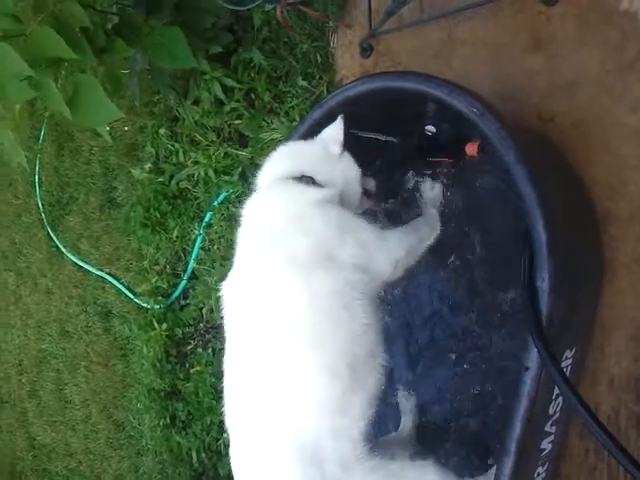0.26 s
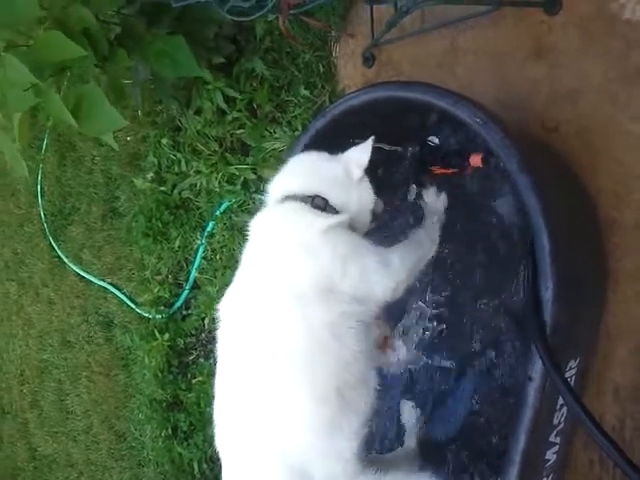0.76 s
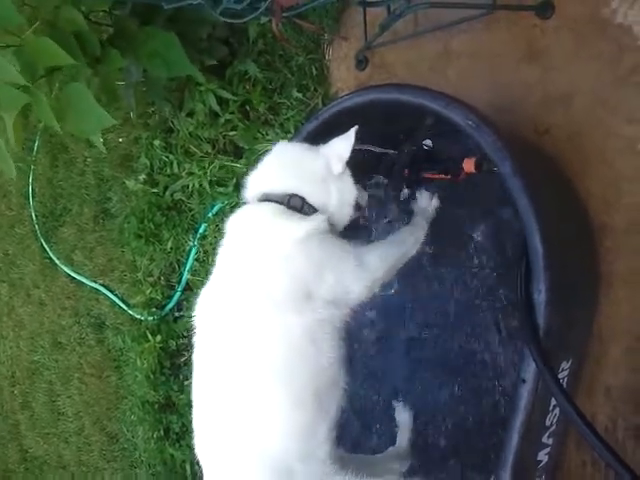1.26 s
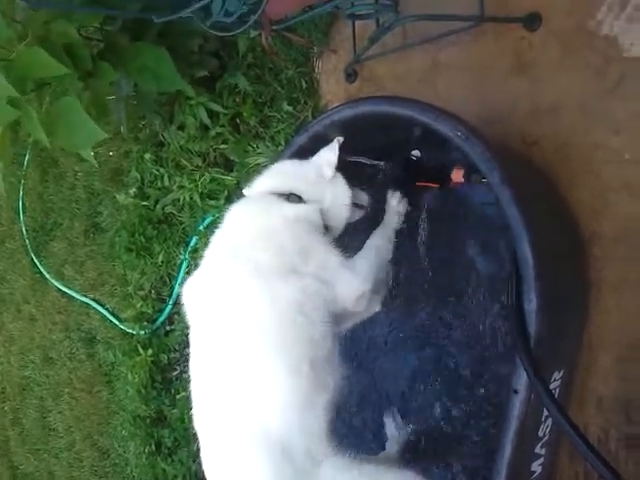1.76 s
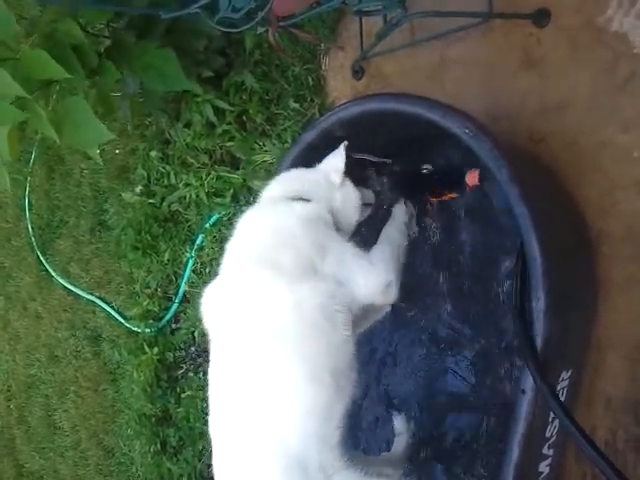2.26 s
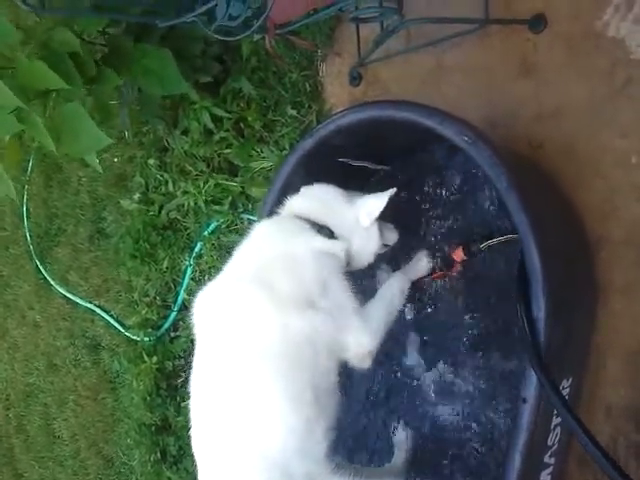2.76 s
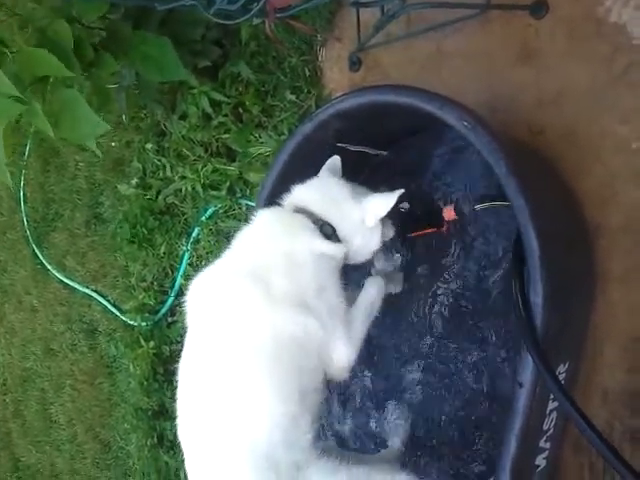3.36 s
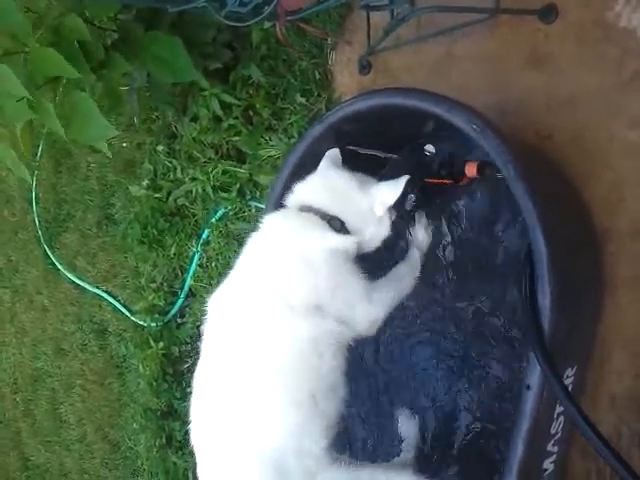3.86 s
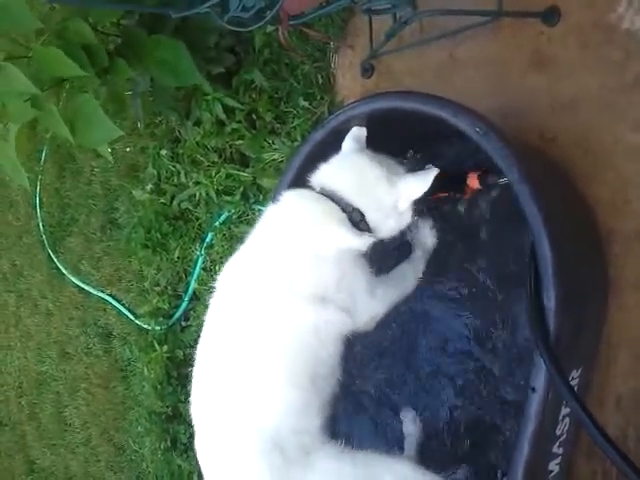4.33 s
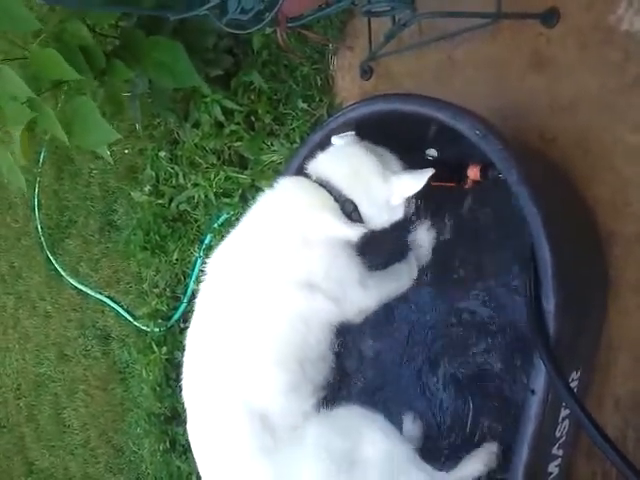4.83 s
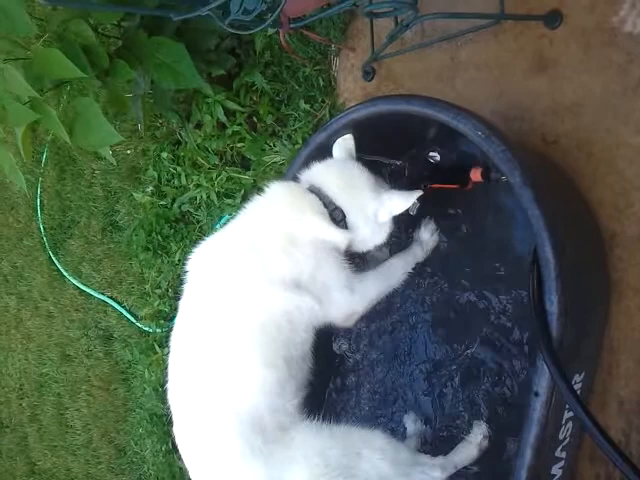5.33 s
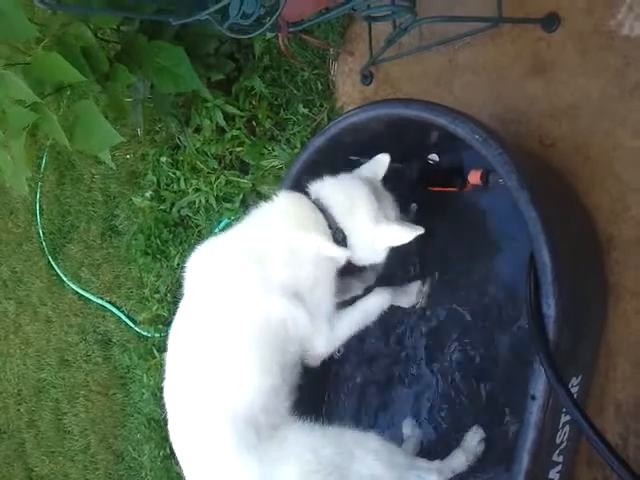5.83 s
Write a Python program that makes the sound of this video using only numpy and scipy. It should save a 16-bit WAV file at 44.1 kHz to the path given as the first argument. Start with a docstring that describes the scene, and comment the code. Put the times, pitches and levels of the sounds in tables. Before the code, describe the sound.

A dog paws at shallow water in a plastic tub, splashing in short bursts with dull bumps, over a steady low machine hum.

```python
"""A yard with a big plastic stock tub: a dog paws at the shallow water in it.
Strokes and slaps drive filtered random clicks as slosh and spray, plus clouds of ringing bubbles.
Single drops smack, air pockets plop and gurgle; bumps and drags of the paws drum on the tub's floor.
Nearby a compressor and its fan hum as wandering harmonics over a faint steady hiss of coloured noise."""
import sys
import numpy as np
from scipy import signal
from scipy.fft import rfft, irfft
from scipy.io import wavfile
from scipy.ndimage import uniform_filter1d

SR = 44100
rng = np.random.default_rng(int(sys.argv[2]) if len(sys.argv) > 2 else 0)


def generate_wav(sig):
    """Save sig (samples, or channels by samples) to the path in sys.argv[1] as 16-bit PCM at SR."""
    pcm = np.round(np.clip(np.atleast_2d(sig).T, -1, 1) * 32767).astype(np.int16)
    wavfile.write(sys.argv[1], SR, pcm)


N = 268569
TIME = np.arange(N) / SR


def from_db(db):
    """Decibels to an amplitude gain."""
    return 10 ** (np.asarray(db) / 20)


def rms_one(x):
    """Scale to an rms of one."""
    return x / np.sqrt(np.mean(x ** 2) + 1e-20)


def add(out, start_s, sound):
    """Mix a sound in at a time."""
    at = max(round(start_s * SR), 0)
    out[at:at + len(sound)] += sound[:N - at]


def drift(rate_hz):
    """Smooth chance with an rms of one: low-passed noise, drawn every 40 samples and interpolated."""
    step = 40
    pole = np.exp(-2 * np.pi * rate_hz * step / SR)
    settle = 2000
    noise = rng.standard_normal(N // step + settle + 2)
    slow = signal.lfilter([1], [1, -2 * pole, pole * pole], noise)[settle:]
    return np.interp(np.arange(N) / step, np.arange(len(slow)), rms_one(slow))


def colour(x, spectrum):
    """Causal (minimum-phase) filter with this spectrum; white input keeps its power."""
    size = 8192
    hz, db = np.transpose(spectrum)
    bin_hz = np.arange(size // 2 + 1) * SR / size
    gain = rms_one(from_db(np.interp(np.log(bin_hz + 1), np.log(hz), db)))
    # folding the cepstrum onto positive times gives minimum phase
    cepstrum = irfft(np.log(gain))
    cepstrum[1:size // 2] *= 2
    cepstrum[size // 2 + 1:] = 0
    impulse_response = irfft(np.exp(rfft(cepstrum)))
    return signal.fftconvolve(x, impulse_response)[:N]


def grains(per_s, spread_db):
    """Random clicks of either sign, many small and a few large; rms one."""
    sizes = from_db(spread_db * np.minimum(rng.exponential(1, N), 4))
    signs = rng.choice([-1, 1], N)
    present = rng.random(N) < per_s / SR
    return rms_one(sizes * signs * present)


def bubble(hz, t60_s, rise, pinch_cycles=0.45):
    """A bubble pinches off within a cycle or two, rings, and climbs in pitch as it nears the surface."""
    t = TIME[:int(t60_s * SR)]
    pinch = 1 - np.exp(-t * hz / pinch_cycles)
    ring = np.sin(2 * np.pi * hz * t * (1 + rise * t / t60_s))
    return pinch * ring * from_db(-60 * t / t60_s)


def bubble_cloud(level, per_s, low_hz, high_hz, cycles, spread_db, rise):
    """Bubbles of random size are born at random times, each as loud as the stirring level at its birth."""
    out, energy = np.zeros(N), 0
    for when, size, strength in rng.random((int(per_s * N / SR), 3)):
        hz = low_hz * (high_hz / low_hz) ** size
        loudness = from_db(-spread_db * np.log(max(strength, 0.03))) * np.sqrt(hz / low_hz)
        ring = bubble(hz, cycles / hz, rise) * loudness
        energy += np.sum(ring ** 2)
        add(out, when * N / SR, ring * level[int(when * N)])
    return out / np.sqrt(energy / N)


# Spectrum of the hiss. Each row: frequency in Hz, relative density in dB per Hz.
YARD_SPECTRUM = [(15, -13), (35, 6.5), (55, 0), (130, 3.5), (300, 3.5), (400, 2), (480, 1.5), (720, -2),
                 (870, -0.5), (1100, -3), (1500, -3.5), (1900, -5), (2200, -8.5), (2600, -11), (3100, -9.5),
                 (3400, -13), (3650, -12), (4000, -10.5), (5800, -8.5), (6600, -14), (7100, -13),
                 (7500, -22)]


def yard(level_db=-40, waver_db=1.1, waver_hz=4.4):
    """Fan air and a faint hiss: coloured noise, wavering a little."""
    level = from_db(level_db + waver_db * drift(waver_hz))
    return level * colour(rng.standard_normal(N), YARD_SPECTRUM)


def motor(orders, hz, wander_share, flutter_db):
    """Harmonics of a rotor whose speed wanders; the high ones flutter most."""
    phase = 2 * np.pi * hz * np.cumsum(1 + wander_share * drift(3.0)) / SR
    out = np.zeros(N)
    for order, db in orders:
        depth_db = flutter_db * np.tanh(order / 20)
        level = np.sqrt(2) * from_db(db + depth_db * drift(3.6))
        out += level * np.sin(order * phase + rng.uniform(0, 2 * np.pi))
    return out


# Compressor harmonics. Each row: multiple of the turning rate, rms in dB before flutter.
COMPRESSOR_ORDERS = [(1, -61), (4, -40.5), (8, -57.5), (19, -57.5), (22, -64), (24, -58.5), (25, -60.5),
                     (26, -58.5), (38, -67), (44, -60), (67, -62.5), (82, -61)]
# Fan harmonics. Each row: multiple of the blade rate, rms in dB before flutter.
FAN_ORDERS = [(1, -50.5), (2, -56.5), (5, -58), (6, -56)]


def compressor(turning_hz=58.37, blade_hz=56.4):
    """A steady compressor and its less steady fan, each a sum of rotor harmonics."""
    hum = motor(COMPRESSOR_ORDERS, turning_hz, wander_share=0.0007, flutter_db=2.0)
    fan = motor(FAN_ORDERS, blade_hz, wander_share=0.016, flutter_db=6.5)
    return hum + fan


def ripples(level_db=-51.5):
    """Wavelets lap at the wall and the dog's legs all the time, leaving sparse soft bubbles."""
    cloud = bubble_cloud(np.ones(N), per_s=35, low_hz=421.4, high_hz=1640, cycles=36.0,
                         spread_db=3.0, rise=0.15)
    return from_db(level_db) * cloud


# One gurgle as water closes over a paw. Each row: time in seconds, pitch in Hz, level in dB before flutter.
GURGLE_PATH = [(1.003, 842, -42), (1.011, 816, -30), (1.035, 741, -44), (1.061, 646, -36),
               (1.081, 755, -33), (1.112, 816, -43)]


def gurgle(flutter_db=3.5):
    """A large air pocket: its note sinks as it grows and climbs as it closes."""
    s, hz, db = np.transpose(GURGLE_PATH)
    level = np.interp(TIME, s, from_db(db), left=0, right=0) * from_db(flutter_db * drift(70))
    phase = 2 * np.pi * np.cumsum(np.interp(TIME, s, hz)) / SR
    return level * np.sin(phase)


# Single air pockets under the paws. Each row: start in seconds, relative level in dB, mid pitch in Hz,
# length in seconds, glide from start to end as a share of the pitch.
AIR_POCKETS = [(0.003, -20, 304, 0.019, -0.14), (0.044, -20, 770, 0.0078, -0.2),
               (0.045, -30.5, 1290, 0.019, -0.15), (0.046, -27, 391.6, 0.055, 0.01),
               (0.058, -31, 850, 0.022, 0.2), (0.083, -34, 370, 0.023, 0.2), (0.087, -31, 874, 0.014, 0.17),
               (0.124, -26, 381, 0.01, 0.22), (0.149, -27, 710, 0.0091, 0.2),
               (0.466, -32.5, 393, 0.031, -0.048), (0.478, -21.5, 1480, 0.0085, 0.12),
               (0.591, -32, 2140, 0.016, -0.2), (0.598, -26, 371, 0.023, -0.06),
               (0.779, -32.5, 2132, 0.011, 0.06), (0.907, -32, 1355, 0.021, -0.12),
               (0.97, -32, 2130, 0.022, -0.051), (0.976, -34.5, 1433, 0.063, -0.18),
               (1.006, -33, 1300, 0.043, 0.2), (1.007, -31, 1210, 0.035, 0.12),
               (1.022, -38, 1404, 0.049, -0.051), (1.046, -39, 1380, 0.03, 0.22),
               (1.112, -30, 1170, 0.01, 0.12), (1.162, -38.5, 978, 0.044, 0.15),
               (1.181, -31.5, 378, 0.029, -0.2), (1.182, -37, 1448, 0.048, 0.14),
               (1.201, -39, 2100, 0.028, -0.18), (1.329, -26, 1080, 0.0078, -0.18),
               (1.332, -35, 1550, 0.055, 0.097), (1.353, -28.5, 1459, 0.016, 0.2),
               (1.395, -27.5, 1350, 0.0092, -0.23), (1.775, -39, 847, 0.046, -0.046),
               (1.89, -39.5, 1470, 0.036, -0.0091), (2.182, -31, 1303, 0.0087, -0.2),
               (2.475, -36, 1168, 0.055, -0.1), (2.482, -26, 756, 0.0093, 0.25),
               (2.492, -21, 392, 0.012, 0.25), (2.623, -30, 387, 0.0075, 0.06),
               (2.718, -32.5, 399, 0.052, 0), (2.803, -27, 740, 0.0078, -0.18),
               (2.992, -35, 1449, 0.043, -0.085), (3.583, -29, 323, 0.012, -0.2),
               (3.852, -30, 2220, 0.01, 0), (3.853, -30, 1460, 0.013, 0.2),
               (3.921, -35.5, 1490, 0.015, -0.2), (4.314, -32.5, 2230, 0.014, 0),
               (4.366, -27, 1400, 0.018, 0.12), (4.442, -29.5, 360, 0.033, -0.23),
               (4.702, -34, 1425, 0.016, -0.025), (4.81, -38, 1418, 0.064, -0.085),
               (4.832, -37, 1434, 0.026, 0.22), (4.835, -31, 376, 0.033, 0.18),
               (4.878, -29, 2240, 0.016, -0.15), (4.881, -32, 1500, 0.016, -0.1),
               (4.941, -22, 347, 0.016, -0.2), (5.151, -28, 2280, 0.011, 0.1)]


def plops(level_db=0.5, skew=0.42, rough_share=0.38):
    """An air pocket swells into a note and closes again, gliding as it changes shape; the water jostles it."""
    out = np.zeros(N)
    for s, db, hz, length_s, glide in AIR_POCKETS:
        age = TIME[:int(length_s * SR)] / length_s
        turns = np.cumsum(hz * (1 + glide * (age - 0.5))) / SR
        swell = np.sin(np.pi * age ** skew)   # skew below 1: early peak
        add(out, s, from_db(db + level_db) * swell * np.sin(2 * np.pi * turns))
    return out * (1 + rough_share * drift(99))


# Paws bumping the tub. Each row: start in seconds, level in dB, main pitch in Hz.
TUB_BUMPS = [(0.001, -14, 150), (0.006, -14.5, 207), (0.016, -13.5, 169), (0.031, -17, 95),
             (0.081, -25.5, 100), (0.11, -22, 150), (0.123, -20.5, 149), (0.199, -28, 110),
             (0.271, -26, 131), (0.344, -19, 159), (0.978, -21, 162), (1.385, -29, 84), (2.232, -27.5, 149),
             (2.337, -25, 112), (2.397, -22.5, 191), (2.479, -22, 263), (2.494, -18.5, 185),
             (2.552, -23.5, 100), (2.628, -20, 180), (2.728, -19.5, 150), (2.798, -22, 100),
             (3.117, -17.5, 120), (4.385, -25, 160)]
# Paws dragging over the floor. Each row: start in seconds, length in seconds, relative level in dB.
FLOOR_DRAGS = [(0.0, 0.035, -23.5), (0.06, 0.11, -31.5), (0.153, 0.28, -34), (0.336, 0.031, -33),
               (0.573, 0.035, -31.5), (0.908, .07, -36), (1.06, 0.39, -39.5), (2.176, 0.23, -32),
               (2.437, 0.29, -33), (2.814, 0.28, -39.5), (3.525, 0.11, -44), (4.288, 0.17, -36.5),
               (4.87, 0.15, -42.5)]
# Spectrum of rubs and knocks. Each row: frequency in Hz, relative density in dB per Hz.
TUB_SPECTRUM = [(15, -20.5), (35, 1.5), (70, 4.5), (110, 3), (190, -1.5), (280, -5), (400, -13.5),
                (600, -21), (1500, -35)]


def gesture(start_s, length_s, attack_s, release_s):
    """A paw's effort rises, holds and dies away."""
    attack = np.clip((TIME - start_s) / attack_s, 0, 1)
    return attack * np.exp(-np.maximum(TIME - start_s - length_s, 0) / release_s)


def tub(rub_db=-0.5, knock_db=-9.0, bump_cycles=1.4, shuffle_db=-51):
    """The water damps the plastic floor: a bump bends it for a cycle or two, a dragging paw makes it stutter."""
    bends, knocks = np.zeros(N), np.zeros(N)
    for s, db, hz in TUB_BUMPS:
        length_s = bump_cycles / hz
        t = TIME[:int(2 * length_s * SR)]
        swell = (2 * t / length_s * np.exp(1 - 2 * t / length_s)) ** 2
        add(bends, s, from_db(db) * swell * np.sin(2 * np.pi * hz * t))
        add(knocks, s, from_db(db + knock_db) * swell / 2)
    power = from_db(shuffle_db) ** 2   # the standing dog never keeps quite still
    for s, length_s, db in FLOOR_DRAGS:
        effort = gesture(s, length_s, attack_s=0.0075, release_s=0.051)
        power = power + (from_db(db + rub_db) * effort) ** 2
    return bends + colour((np.sqrt(power) + knocks) * grains(1400, 0.45), TUB_SPECTRUM)


# Single drops hitting the surface. Each row: start in seconds, relative level in dB, pitch in Hz.
FALLING_DROPS = [(0.106, -19, 4060), (0.127, -18.5, 3270), (0.309, -21.5, 4450), (0.3588, -21.5, 3650),
                 (0.389, -19.5, 6100), (0.471, -16, 4580), (0.9012, -15.5, 4880), (1.043, -15, 5100),
                 (1.053, -16, 5650), (1.1072, -17, 5760), (1.342, -25, 6240), (1.349, -19, 4400),
                 (2.4542, -12, 4360), (2.759, -18, 5620), (2.7964, -13, 5650), (2.839, -15, 4740),
                 (2.8574, -17, 5730), (2.8947, -19.5, 5750), (3.583, -23.5, 5940), (3.986, -21.5, 4600),
                 (4.181, -28.5, 4300), (4.314, -23, 5100), (4.3455, -21, 4840), (4.4444, -25, 4500),
                 (4.869, -21, 5600), (4.88, -15.5, 4000), (4.941, -15.5, 5830), (5.1578, -17.5, 4240)]
# Spectrum of spray, also used by water(). Each row: frequency in Hz, relative density in dB per Hz.
SPRAY_SPECTRUM = [(1800, -27.5), (2900, -6), (3420, 5), (3730, -5.5), (4050, -1.5), (4420, 1), (4720, 2),
                  (5080, -3), (5700, 3.5), (6350, -2.5), (6950, -4.5), (7500, -14), (9000, -20)]


def drop_smacks(rise_s=0.0002, length_s=0.0023, ring_db=-3.0, crack_db=-9.5):
    """A drop cracks on the surface and rings a tiny cavity that snaps shut within a few milliseconds."""
    rings, cracks = np.zeros(N), np.zeros(N)
    t = TIME[:int(2 * length_s * SR)]
    shape = (1 - np.exp(-t / rise_s)) * np.exp(-(t / length_s) ** 4)
    for s, db, hz in FALLING_DROPS:
        add(rings, s, from_db(db + ring_db) * shape * np.sin(2 * np.pi * hz * t))
        add(cracks, s, from_db(db + crack_db) * shape * np.exp(-t / length_s))
    return rings + colour(cracks * rng.choice([-1, 1], N), SPRAY_SPECTRUM)


# Paw slaps, scrapes and falling gobs of water. Each row: start in seconds, length in seconds,
# slosh level in dB, spray level in dB.
WATER_SLAPS = [(0.042, 0.01, -36, -31.5), (0.055, 0.027, -47, -29), (0.098, 0.01, -36, -39),
               (0.126, 0.0021, -36.5, -27), (0.149, 0.0056, -39, -47), (0.342, 0.023, -37, -44),
               (0.406, 0.005, -36, -31), (0.467, 0.01, -37, -29.5), (0.496, 0.01, -34.5, -39),
               (0.583, 0.032, -41, -43), (0.725, 0.012, -49, -35.5), (0.944, 0.025, -35.5, -29.5),
               (0.972, 0.04, -37, -35.5), (1.033, 0.027, -48, -31), (1.159, 0.0093, -38, -35),
               (1.19, 0.017, -45, -35), (1.3, 0.018, -36, -32), (1.328, 0.037, -41, -33),
               (2.058, 0.017, -31.5, -36.5), (2.155, 0.04, -34.5, -47), (2.195, 0.018, -42, -35.5),
               (2.4567, 0.0046, -29, -22), (2.471, 0.006, -38, -32), (2.614, 0.03, -33, -40),
               (2.781, 0.033, -41, -26.5), (2.968, 0.0089, -35.5, -38), (3.11, 0.014, -50, -37),
               (3.199, 0.0056, -38.5, -34.5), (4.046, 0.0018, -32, -31), (4.181, 0.003, -34, -37),
               (4.313, 0.011, -34.5, -34.5), (4.346, 0.0042, -36, -28.5), (4.357, 0.038, -37.5, -38.5),
               (4.4422, 0.0078, -33.5, -29), (4.449, 0.024, -38.5, -39), (4.683, 0.03, -37.5, -44.5),
               (4.782, 0.008, -39, -34), (4.815, 0.03, -37.5, -41.5), (4.8675, 0.01, -33, -26),
               (4.88, 0.014, -33.5, -28.5), (4.9425, 0.0061, -33.5, -29.5), (5.044, 0.01, -40, -38),
               (5.153, 0.0081, -31.5, -28)]


def slaps(tail_s=0.011, tail_db=-13, onset_share=0.025):
    """Each slap is a tight cluster of droplet impacts with a short trail; returns its slosh and spray drive."""
    slosh, spray = np.zeros(N), np.zeros(N)
    coarse, fine = grains(14000, 2.4), grains(9000, 1.4)
    for s, length_s, slosh_db, spray_db in WATER_SLAPS:
        t = TIME[:int((length_s + 5 * tail_s) * SR)]
        trail = from_db(tail_db) * np.exp(-np.maximum(t - length_s, 0) / tail_s)
        shape = np.where(t < length_s, 1, trail)
        shape *= 1 - np.exp(-t / (onset_share * length_s))   # a long scrape swells, a short slap cracks
        for out, drops, db in ((slosh, coarse, slosh_db), (spray, fine, spray_db)):
            burst = shape * drops[round(s * SR):][:len(t)]
            # the energy is that of the level held for the slap's length
            add(out, s, from_db(db) * rms_one(burst) * np.sqrt(length_s * SR / len(t)))
    return slosh, spray


# Paws sweeping through the water. Each row: start in seconds, length in seconds,
# relative slosh level in dB, relative spray level in dB.
PAW_STROKES = [(0.0, 0.12, -35.5, -35.5), (0.238, 0.27, -41.5, -43), (0.414, 0.069, -38, -37.5),
               (0.552, 0.12, -39.5, -40.5), (0.683, 0.098, -38, -40.5), (0.836, 0.12, -37, -35),
               (0.919, 0.17, -35, -37), (1.107, 0.099, -34, -33), (1.23, 0.15, -35.5, -37.5),
               (2.006, 0.17, -40.5, -41.5), (2.152, 0.039, -41.5, -34), (2.338, 0.16, -39.5, -41.5),
               (2.452, 0.079, -33, -37), (2.541, 0.14, -34, -33.5), (2.708, 0.19, -32.5, -33),
               (2.755, 0.09, -44.5, -25), (2.913, 0.16, -37.5, -40.5), (4.03, 0.06, -45, -42),
               (4.258, 0.23, -41.5, -44), (4.56, 0.071, -54, -39), (4.757, 0.12, -43.5, -46),
               (4.867, 0.07, -34, -37), (4.966, 0.15, -44.5, -41)]


def stirring(settle_s=0.78, settle_db=-9.5, calm_slosh_db=-52.5, calm_spray_db=-53):
    """Slosh and spray levels: the strokes add up, and the water takes a while to calm down after them."""
    power = np.zeros((2, N))
    for s, length_s, *dbs in PAW_STROKES:
        effort = gesture(s, length_s, attack_s=0.015, release_s=0.039)
        power += np.outer(from_db(dbs), effort) ** 2
    keep = np.exp(-1 / (settle_s * SR))
    # the stirred water keeps lapping and dripping
    settling = from_db(settle_db) ** 2 * signal.lfilter([1 - keep], [1, -keep], power)
    trickle = from_db([[calm_slosh_db], [calm_spray_db]]) ** 2
    return np.sqrt(power + settling + trickle)


def clumped(level, clump_db, rate_hz, merge_db=-30):
    """Light stirring comes in separate clumps; in a heavy splash they merge into an even rush."""
    depth_db = clump_db / (1 + (level / from_db(merge_db)) ** 2)
    mean_power_db = np.log(10) / 20 * depth_db ** 2   # subtracted, so the mean power stays
    return level * from_db(depth_db * drift(rate_hz) - mean_power_db)


# Spectrum of slosh. Each row: frequency in Hz, relative density in dB per Hz.
SLOSH_SPECTRUM = [(200, -9.5), (400, -1.5), (560, -2), (800, -4.5), (1050, -2.5), (1470, 4.5), (1850, -4.5),
                  (2260, 2), (2700, -12.5), (4000, -19)]


def water(slosh_db=-5.0, spray_db=-4.0, big_bubbles_db=-8.5, small_bubbles_db=-5.0):
    """Slosh, spray and bubbles follow the stirring; slaps stand out of them and trap bubbles of their own."""
    slosh, spray = stirring()
    slap_slosh, slap_spray = slaps()
    stroke_slosh = from_db(slosh_db) * clumped(slosh, clump_db=3.0, rate_hz=120) * grains(2000, 3.2)
    stroke_spray = from_db(spray_db) * clumped(spray, clump_db=2.5, rate_hz=100) * grains(1500, 2.5)
    body = colour(slap_slosh + stroke_slosh, SLOSH_SPECTRUM)
    drops = colour(slap_spray + stroke_spray, SPRAY_SPECTRUM)
    trapped = uniform_filter1d(slap_spray ** 2, size=200)   # smoothed slap power
    big = bubble_cloud(slosh, per_s=220, low_hz=622.5, high_hz=1653, cycles=40.0,
                       spread_db=2.5, rise=0.15)
    small = bubble_cloud(np.sqrt(spray ** 2 + trapped), per_s=650, low_hz=3800, high_hz=6444, cycles=110,
                         spread_db=3.5, rise=0.061)
    return body + drops + from_db(big_bubbles_db) * big + from_db(small_bubbles_db) * small


def scene():
    """All sources, heard in the open from above the tub."""
    background = yard() + compressor()
    pockets = ripples() + gurgle() + plops()
    return (background + pockets + tub() + drop_smacks() + water())[None]


def record(dry, dip_hz=2730, dip_q=3.7, dip_share=0.12, cutoff_hz=7500):
    """The small microphone has a dip in its upper middle, and its channel cuts the top steeply."""
    peak = signal.lfilter(*signal.iirpeak(dip_hz, dip_q, fs=SR), dry)
    voiced = dry - dip_share * peak
    low_pass = signal.ellip(12, 0.2, 90, cutoff_hz, fs=SR, output="sos")
    return signal.sosfilt(low_pass, voiced)


dry = scene()
out = record(dry)
generate_wav(out)
```